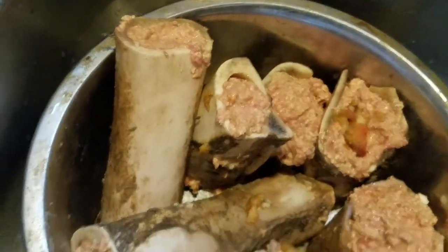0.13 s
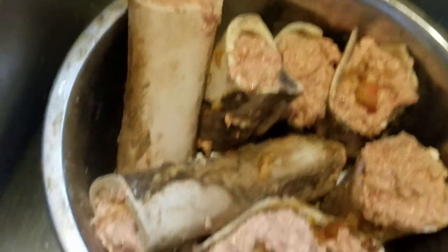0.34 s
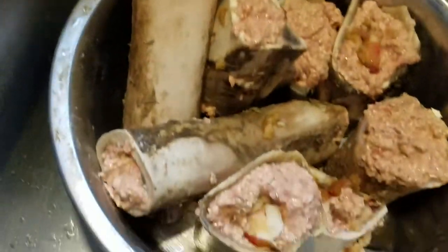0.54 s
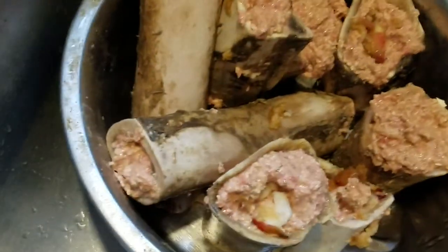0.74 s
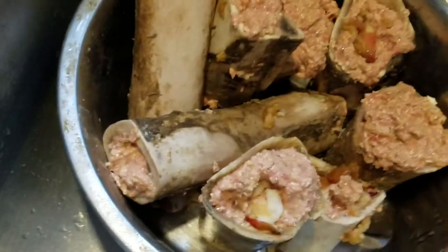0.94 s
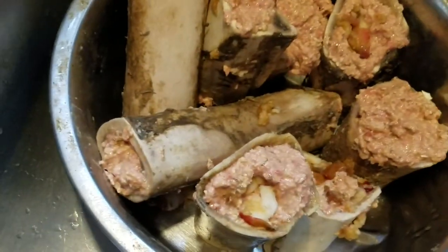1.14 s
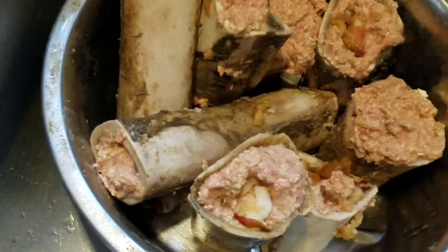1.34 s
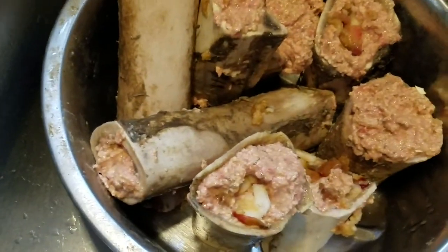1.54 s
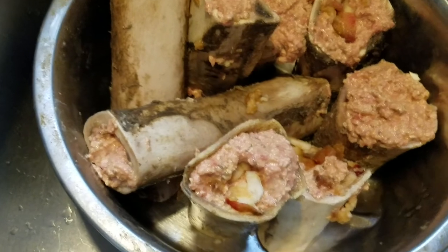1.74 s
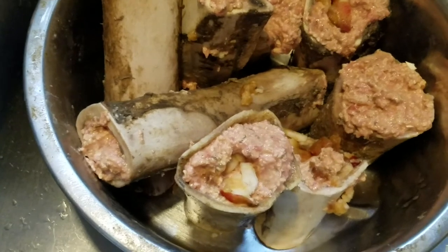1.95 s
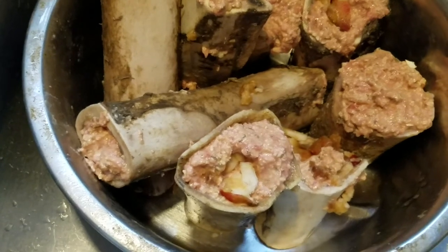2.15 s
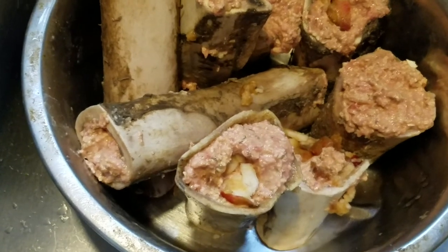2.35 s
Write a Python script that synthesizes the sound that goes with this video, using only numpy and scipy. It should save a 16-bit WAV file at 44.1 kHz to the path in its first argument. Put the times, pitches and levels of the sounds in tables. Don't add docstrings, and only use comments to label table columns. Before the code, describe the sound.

A dog gives a low, rattling growl for under a second, smacks its lips wetly, then three soft thumps boom on a metal worktop, each louder, in a small humming kitchen, close phone microphone.

```python
import sys
import numpy as np
from scipy import signal
from scipy.fft import rfft, irfft, next_fast_len
from scipy.io import wavfile
from scipy.ndimage import uniform_filter1d, map_coordinates

SR = 44100
rng = np.random.default_rng(int(sys.argv[2]) if len(sys.argv) > 2 else 0)


def store_pcm(level_fs):
    pcm = np.round(np.clip(level_fs, -1, 1) * 32767).astype(np.int16)
    wavfile.write(sys.argv[1], SR, np.atleast_2d(pcm).T)


def to_linear_factor(level_db):
    exponent = np.asarray(level_db, float) / 20
    return 10 ** exponent


N = 105928

# frequency in Hz, level in dB per Hz.
HUM_SPECTRUM = [(12, -68), (20, -4), (59, 6.5), (156, 1), (236, -1), (452, -2), (670, -6), (1200, -13),
                (1560, -17), (2640, -120)]
# frequency in Hz, level in dB per Hz.
HISS_SPECTRUM = [(590, -18.5), (1000, 0.5), (1250, -9.5), (1660, -5.5), (2550, -5), (2760, -9), (5140, -14),
                 (7270, -20), (15800, -14.5)]
# frequency in Hz, left-right correlation from -1 to 1.
STEREO_LIKENESS = [(60, 0.92), (300, 0.5), (700, 0.2), (1500, 0.018), (4000, -0.2), (12000, 0.018)]
# centre in Hz, width in Hz, level in dB.
APPLIANCE_BANDS = [(2433, 83, -80.5), (4566, 47, -84), (10900, 64, -87)]
# start in seconds, end in seconds.
WHISTLE_SPELLS = [
    (1.3, 1.56),
    (1.65, 2.1),
    (2.1, 2.6),
]
# frequency in Hz, left over right in dB.
PORT_BALANCE = [(100, -2.5), (300, 0.4), (1000, -0.2), (5500, 4), (8500, 1.5), (11000, -3.5), (13000, 4.5)]
# time in seconds, level in dB, mouth opening from 0 to 1.
GROWL_SHAPE = [(0, -47, 0.14), (0.048, -48.5, 0.49), (0.109, -45.5, 0.21), (.2, -47, 0.76),
               (.29, -44, 0.01), (.39, -39, 0.97), (.44, -40, 0.92), (0.635, -42, 0.87), (.65, -51, 0.72)]
# time in seconds, pitch in Hz, jitter as a share of a cycle,
# strong-weak alternation from 0 to 1.
FOLD_MOTION = [(0, 105, .1, .7), (.1, 99, .06, .3), (.21, 97, .14, .5), (.29, 103, .03, .1),
               (.42, 114, .06, .2), (.49, 116, .09, .4), (.52, 103, .04, .15), (.555, 104, .05, .1),
               (.575, 119, .025, .05)]
# resonance in Hz, width in Hz, level in dB.
SHUT_MOUTH = [(110, 50, -5), (203, 32, 0), (308.6, 30, 2.5), (583, 24, -8), (740, 30, -14), (825, 34, -4)]
# resonance in Hz, width in Hz, level in dB.
OPEN_MOUTH = [(125, 53, -2), (203, 34, 1), (248, 34, -1), (310, 30, 2), (360, 30, -9), (594, 24, -6),
              (720, 18, -9), (888, 26, 1), (957, 24, -10), (1075, 25, -22)]
# resonance in Hz, width in Hz, level in dB.
TEETH_BREATH = [(1323, 80, 7.5), (1786, 164, 11), (2830, 730, -9.5), (5220, 1100, -7.5)]
# start in seconds, level in dB, centre in Hz, length in seconds.
CLOTH_RUSTLES = [(0.096, -62.5, 2300, 0.023), (0.17, -61, 2340, 0.071), (0.209, -51, 2570, 0.011),
                 (.21, -60.5, 9100, 0.018), (0.662, -63.5, 2570, 0.029), (0.418, -64.5, 4800, 0.024),
                 (0.808, -63, 1350, 0.021), (0.871, -67.5, 3500, 0.0067), (0.864, -65.5, 11600, 0.0045),
                 (0.974, -67, 1890, 0.0089), (1.538, -65.5, 2950, 0.0071), (1.647, -62.5, 1230, 0.013),
                 (1.906, -67, 12000, 0.0043), (1.96, -62.5, 2160, 0.029), (1.968, -68, 4500, 0.016),
                 (0, -54.5, 2800, .003), (0, -59.5, 10900, 0.0028), (.42, -67, 11500, .01),
                 (1.957, -65.5, 12100, .015), (2.126, -70, 4420, 0.025)]
# start in seconds, peak in dB, frequency in Hz.
HAND_BUMPS = [
    (0.019, -50, 61.7),
    (0.109, -46, 65),
    (.47, -47, 39),
    (2.37, -36.5, 44),
]
# start in seconds, peak in dB, frequency in Hz, t60 in seconds.
SHARP_TICKS = [
    (.2068, -48, 1700, .025),
    (.2085, -51, 3500, .015),
    (.2112, -53, 4800, .008),
    (.213, -54, 2300, .015),
    (2.072, -64, 2400, .03),
    (1.957, -62, 2200, .03),
    (.928, -52, 1500, .003),
    (.9696, -48, 1200, .003),
    (.9729, -44, 560, .004),
]
# start in seconds, peak in dB, lower mode in Hz,
# lower mode in dB, lowest mode in dB.
MAIN_THUMPS = [
    (1.304, -42, 106, 1, -12),
    (1.610, -31.5, 103, -1, -12),
    (1.9567, -25, 107.4, 2.5, -20),
]
# start in seconds, peak in dB, lower mode in Hz,
# lower mode in dB, lowest mode in dB.
LIGHT_TOUCHES = [
    (0.656, -50, 85, 7.6, -15),
    (0.8953, -49.5, 102, 1.6, -14),
    (.985, -61, 101, 4.2, -11),
    (1.481, -62.5, 103, 3.5, 3),
    (1.908, -57, 105, 2, -20),
    (2.177, -61, 115, 8.5, -22),
    (2.215, -66, 112, 5.3, -21),
    (2.044, -55, 98, 5.1, -14),
]
# mode in Hz, level in dB, t60 in seconds, starting sign.
BEATING_MODES = [(139.5, 0, .26, 1), (129.5, -4, .34, -1)]
# mode in Hz, level in dB, t60 in seconds.
OTHER_MODES = [(85.8, -23, 0.4), (48.7, -21, 0.29), (196, -23.5, 0.38), (240, -19, 0.1), (385, -36, 0.07),
               (480, -33, 0.09)]
# start in seconds, level in dB.
AIR_PUFFS = [
    (1.303, -30),
    (1.614, -20.5),
    (1.957, -25.5),
]
# frequency in Hz, level in dB per Hz.
PUFF_SPECTRUM = [(150, -0.5), (250, 3.5), (500, -4.5), (900, -18.5), (1500, -48)]
# start in seconds, peak in dB, frequency in Hz, t60 in seconds.
LIP_SMACKS = [(.7825, -51, 750, .007), (.8055, -55, 1200, .015), (.8085, -55, 1300, .012),
              (.811, -53, 850, .02), (.815, -54, 1000, .015), (.804, -57, 1600, .01),
              (.829, -59, 1250, .01), (.832, -60, 600, .015), (.853, -61, 1300, .008),
              (.904, -57, 900, .006), (.9696, -42, 520, .004), (.9729, -46, 245, .04),
              (.976, -64, 960, .04), (.986, -63, 1000, .02)]
# frequency in Hz, t60 in seconds.
KITCHEN_DECAY = [(100, 0.1), (1000, 0.16), (8000, 0.21)]


def unit(x):
    return x / np.sqrt(np.mean(x ** 2) + 1e-20)


def along(points, hz):
    f, v = np.transpose(points)
    return np.interp(np.log(hz + 1), np.log(f + 1), v)


def curves(rows):
    s, *cols = np.transpose(rows)
    return [np.interp(np.arange(N) / SR, s, c) for c in cols]


def wobble(rate):
    knots = rng.standard_normal(int(N * rate / SR) + 4)
    return map_coordinates(knots, [np.arange(N) * rate / SR])


def filtered(x, response):
    m = next_fast_len(N + SR // 2)
    return irfft(rfft(x, m) * response(np.fft.rfftfreq(m, 1 / SR)), m)[..., :N]


def resonances(peaks):
    def response(f):
        total = 0
        for k, (centre, width, db) in enumerate(peaks):
            damping = 1j * f * width
            total = total + (-1) ** k * to_linear_factor(db) * damping / (centre * centre - f * f + damping)
        return total
    return response


def ring(start_s, db, hz, t60, rise_s):
    out, i = np.zeros(N), int(start_s * SR)
    t = np.arange(min(int(t60 * SR), N - i)) / SR
    envelope = to_linear_factor(db - 60 * t / t60) * (1 - np.exp(-t / rise_s))
    out[i:i + len(t)] = -envelope * np.sin(2 * np.pi * hz * t)
    return out


def placed(x, pan_db, lag_s):
    side = np.array([[1], [-1]])
    return filtered(x, lambda f: to_linear_factor(side * pan_db / 2) * np.exp(1j * np.pi * f * lag_s * side))


def rush(spectrum, patchy_db):
    z = signal.stft(rng.standard_normal((2, N)), nperseg=512)[2]
    field = uniform_filter1d(rng.standard_normal(z.shape[1:]), size=8, axis=0)
    field = uniform_filter1d(field, size=8, axis=1)
    pair = signal.istft(z * to_linear_factor(patchy_db * unit(field)), nperseg=512)[1][:, :N]

    def mid_side(f):
        turn = np.arccos(np.clip(along(STEREO_LIKENESS, f), -1, 1)) / 2
        return to_linear_factor(along(spectrum, f)) * [np.cos(turn), np.sin(turn)]

    mid, side = filtered(pair, mid_side)
    return np.array([mid + side, mid - side]) / np.sqrt(np.mean(mid ** 2))


def noise_band(hz, width_hz):
    return unit(filtered(rng.standard_normal((2, N)), resonances([(hz, width_hz, 0)])))


def room_floor():
    t = np.arange(N) / SR
    hum = to_linear_factor(-64 + 0.5 * wobble(4)) * rush(HUM_SPECTRUM, patchy_db=1)
    hiss = to_linear_factor(-69 + 0.5 * wobble(8) + 1.3 * wobble(40)) * rush(HISS_SPECTRUM, patchy_db=0.8)
    whine = sum(to_linear_factor(db + 2.5 * wobble(7)) * noise_band(hz, width) for hz, width, db in APPLIANCE_BANDS)
    spells = sum((t > start) * (t < end) * 1.0 for start, end in WHISTLE_SPELLS)
    on = uniform_filter1d(spells, size=2400)
    whistle = to_linear_factor(-85 + 4 * wobble(14.2)) * on * noise_band(6450, 36)
    return filtered(hum + hiss + whine + whistle, lambda f: to_linear_factor(along(PORT_BALANCE, f) * [[0.5], [-0.5]]))


def fold_pulses(cycles, pitch_hz, jitter, uneven):
    second_db, second_cycle, scatter_db = -8, 0.42, 2
    at = np.flatnonzero(np.diff(np.floor(cycles)))
    luck = rng.standard_normal((len(at), 4))
    period = SR / pitch_hz[at]
    alternation = 1 - uneven[at] * (np.arange(len(at)) % 2)
    size = to_linear_factor(scatter_db * luck[:, 0]) * alternation
    first = np.clip(at + jitter[at] * luck[:, 1] * period, 0, N - 1).astype(int)
    second = first + (second_cycle + jitter[at] * luck[:, 2]) * period
    second = np.clip(second, 0, N - 1).astype(int)
    second_size = size * to_linear_factor(second_db + scatter_db * luck[:, 3])
    return np.bincount(first, size, N) + np.bincount(second, second_size, N)


def mouth(source, shape):
    def response(f):
        high = f / (f - 60j)
        ratio = f / 1010
        return resonances(shape)(f) * (high / (1 + 1j * ratio / 0.67 - ratio ** 2)) ** 2
    return unit(filtered(source, response))


def teeth(rasp):
    air = rasp + 0.44 * rng.standard_normal(N) * np.std(rasp)
    return unit(filtered(air, lambda f: resonances(TEETH_BREATH)(f) * (f / (f - 900j)) ** 2))


def growl():
    end_s, release_s, breath_db = 0.696, 0.004, -17.5
    t = np.arange(N) / SR
    level_db, opening = curves(GROWL_SHAPE)
    opening = np.clip(opening, 0, 1)
    pitch_hz, jitter, uneven = curves(FOLD_MOTION)
    end_rise_hz = 170 * np.clip(t - 0.595, 0, 0.1)
    cycles = 1 - 200 / SR + np.cumsum(pitch_hz + end_rise_hz) / SR
    pulses = fold_pulses(cycles, pitch_hz, jitter, uneven)

    rasp = signal.lfilter([1], [1, -np.exp(-1 / (0.0097 * SR))], pulses) * rng.standard_normal(N)
    source = unit(pulses - pulses.mean()) + 6 * jitter * unit(rasp) + 0.3 * rng.standard_normal(N)
    voice = unit((1 - opening) * mouth(source, SHUT_MOUTH) + opening * mouth(source, OPEN_MOUTH))

    settled = np.clip(np.minimum(t - 0.58, 0.643 - t) / 0.012, 0, 1)
    phase = 2 * np.pi * cycles
    chest = settled * (to_linear_factor(-2) * np.cos(phase) + to_linear_factor(-4) * np.cos(2 * phase))

    release = 1 + np.exp(np.clip((t - end_s) / release_s, -50, 50))
    envelope = to_linear_factor(level_db + 1.2 * wobble(25.1)) / release
    return envelope * (chest + voice + to_linear_factor(breath_db) * teeth(rasp))


def rustles():
    lead = SR // 20
    out = np.zeros((2, N + lead))
    t = np.arange(-lead, SR // 5) / SR
    f = np.fft.rfftfreq(len(t), 1 / SR)
    for start_s, db, hz, length in CLOTH_RUSTLES:
        noise = rng.standard_normal(len(t)) + 2.5 * rng.standard_normal((2, len(t)))
        colour = np.exp(-(np.log2((f + 1) / hz) / 1.1) ** 2)
        puff = unit(irfft(rfft(noise) * colour, len(t)))
        fall = np.where(t < 0, 9 * (t / length) ** 2, np.abs(t / length))
        out[:, int(start_s * SR):][:, :len(t)] += to_linear_factor(db) * puff * np.exp(-fall)
    return out[:, lead:]


def handling():
    return sum(ring(s, db, hz, 0.14, 0.023) for s, db, hz in HAND_BUMPS)


def pops(rows):
    return sum(ring(s, db + 6.5, hz, t60, 1 / SR) for s, db, hz, t60 in rows)


def ticks():
    return pops(SHARP_TICKS)


def worktop():
    out = np.zeros(N)
    for start_s, db, low_hz, low_db, lowest_db in LIGHT_TOUCHES + MAIN_THUMPS:
        modes = BEATING_MODES + [(low_hz, low_db, 0.16, -1), (66, lowest_db, 0.2, -1)]
        modes = modes + [(hz, level, t60, 1) for hz, level, t60 in OTHER_MODES]
        for hz, level, t60, sign in modes:
            out += sign * ring(start_s, db + level, hz, t60, rise_s=0.005)
    return out


def smacks():
    return pops(LIP_SMACKS)


def thump_puffs():
    t = np.arange(N) / SR
    fade = sum(to_linear_factor(db - 29.5 - 60 * np.abs(t - s) / 0.35) * (t > s) for s, db in AIR_PUFFS)
    return fade * unit(filtered(rng.standard_normal(N), lambda f: to_linear_factor(along(PUFF_SPECTRUM, f))))


def kitchen(x):
    hz, t, z = signal.stft(rng.standard_normal((2, SR // 2)), SR, nperseg=256)
    decay = to_linear_factor(-60 * t / along(KITCHEN_DECAY, hz)[:, None])
    tail = signal.istft(z * decay, SR, nperseg=256)[1]
    tail = filtered(np.pad(tail, ((0, 0), (0, N)))[:, :N], lambda f: f / (f - 250j))
    tail = tail / np.linalg.norm(tail, axis=1, keepdims=True)
    delayed = np.pad(x, (300, 0))[None]
    return signal.fftconvolve(delayed, tail, axes=1)[:, :N]


def scene():
    dog = growl()
    lips = ticks() + smacks()
    near = placed(dog, pan_db=-0.2, lag_s=0.000288) + placed(lips, pan_db=1.3, lag_s=0.00008)
    room = to_linear_factor(-3.5) * kitchen(dog + lips)
    steel = placed(worktop() + thump_puffs(), pan_db=-2.5, lag_s=0.00041)
    return near + room + steel + handling() + rustles() + room_floor()


def top_cut(x):
    return signal.sosfilt(signal.butter(12, 15780, fs=SR, output="sos"), x)


def record(dry):
    mix = dry - 0.00044
    return top_cut(mix)


dry = scene()
out = record(dry)
store_pcm(out)
```